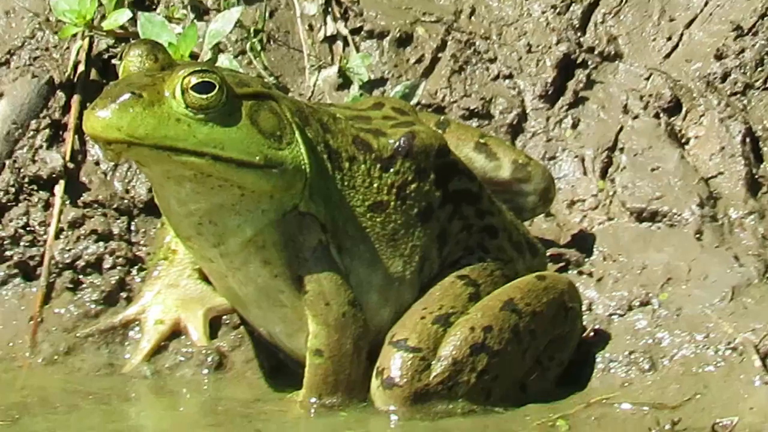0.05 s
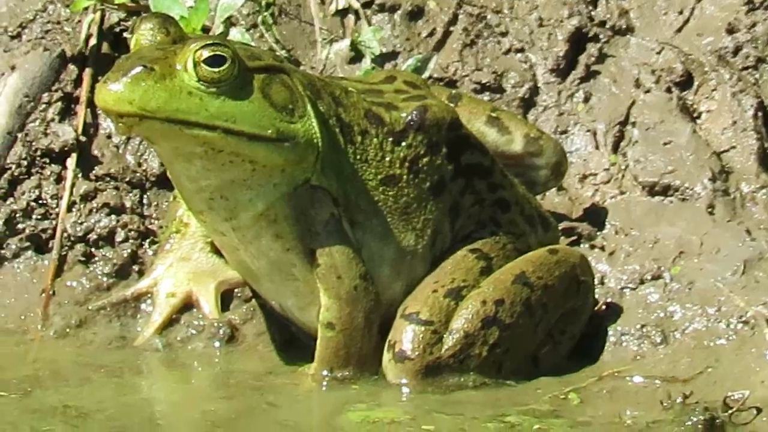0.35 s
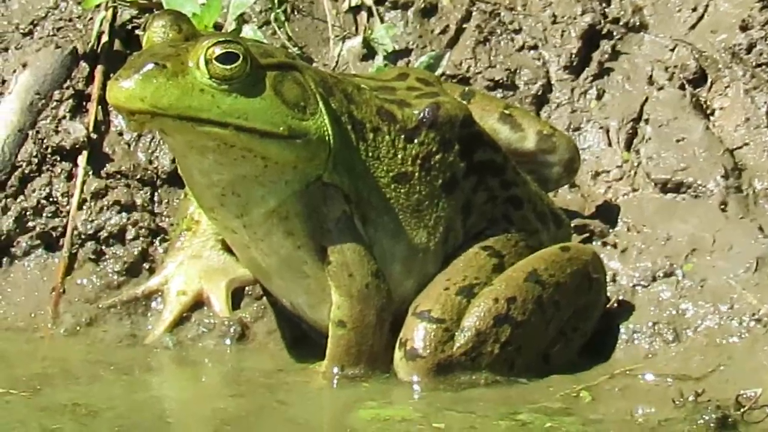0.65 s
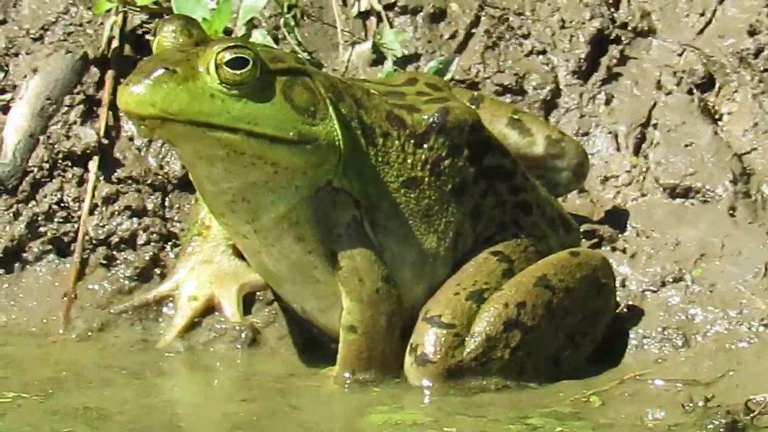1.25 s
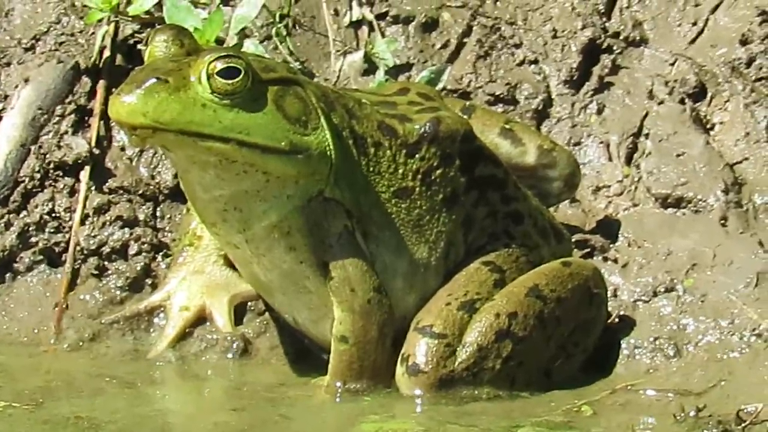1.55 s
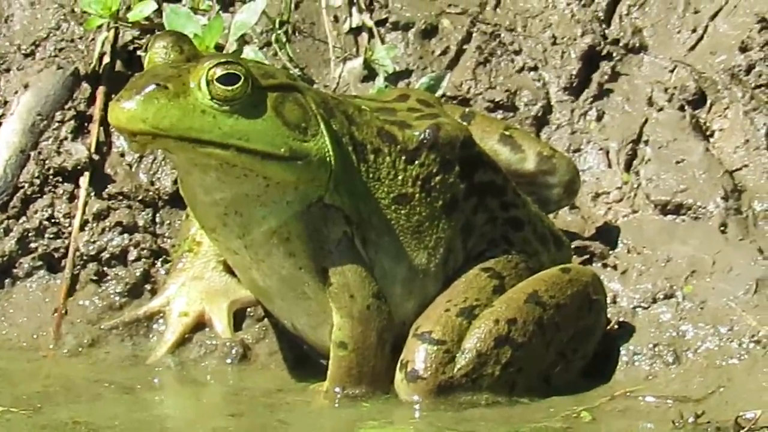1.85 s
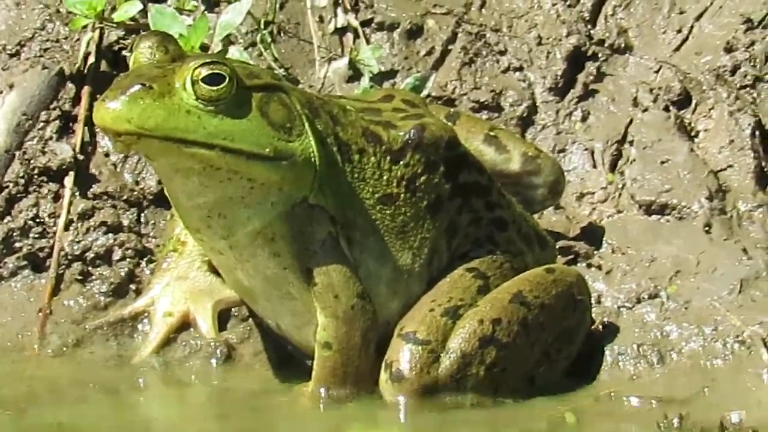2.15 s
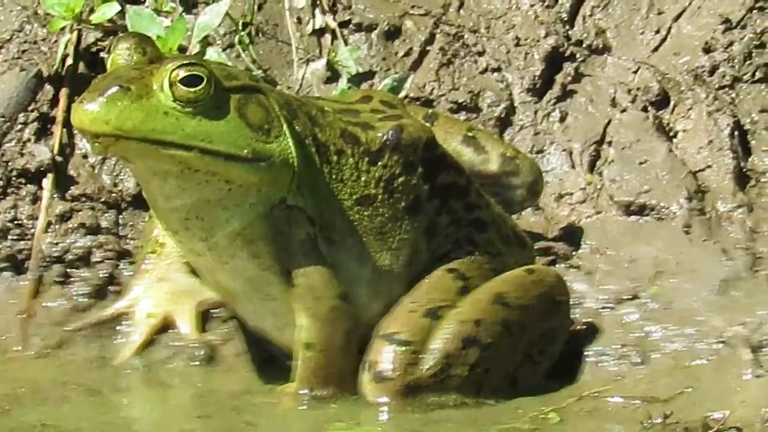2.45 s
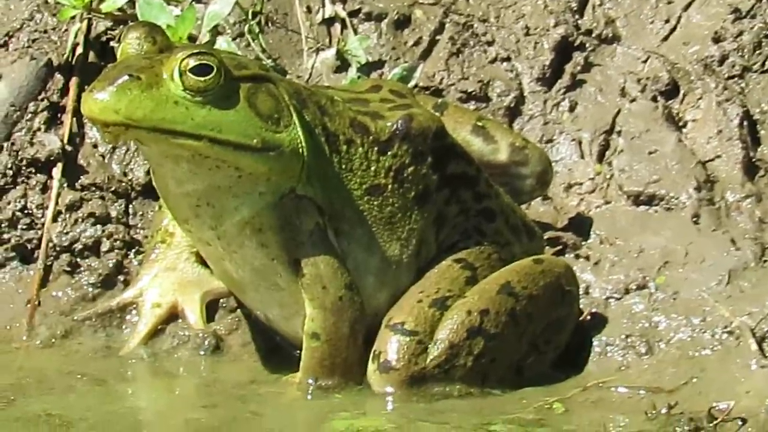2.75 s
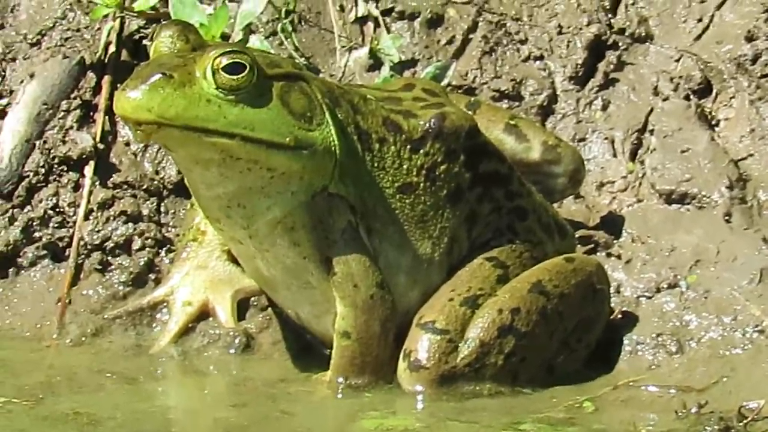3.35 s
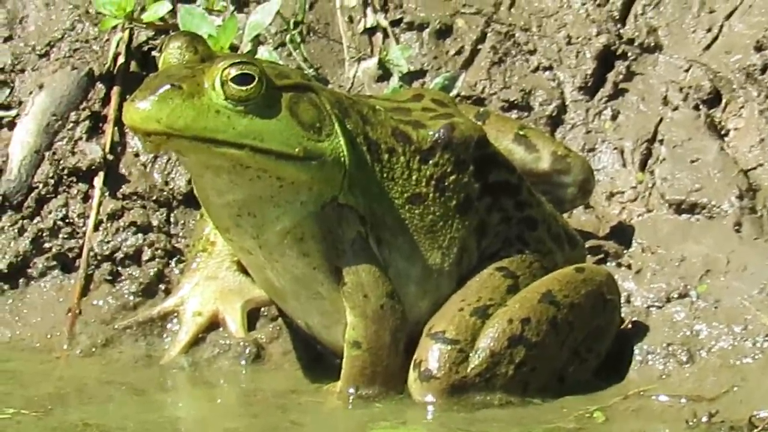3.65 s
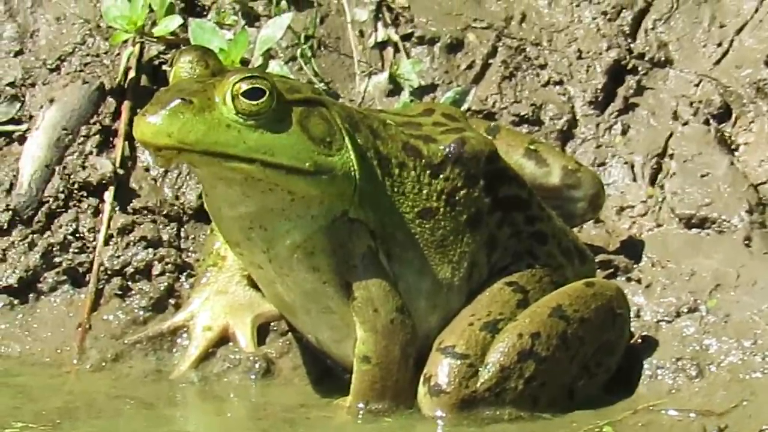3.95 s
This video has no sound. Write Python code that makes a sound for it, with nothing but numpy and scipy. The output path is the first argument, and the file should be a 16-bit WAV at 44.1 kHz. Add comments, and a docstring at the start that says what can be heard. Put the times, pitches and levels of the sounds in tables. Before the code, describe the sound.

Low throb and hum of a distant idling engine, with brief bird chirps and faraway traffic.

```python
"""A heavy engine idles some way off, heard in stereo from a pond bank in the open air.
Its unequal cylinders give a low thud, its body throbs in every cycle, and it hums steadily.
Behind it lies the wash of distant traffic; a light breeze lifts the hiss of the leaves towards the end.
A small bird whistles a run of falling chirps, doubled by the near bank; fainter chirps come later."""
import sys
import numpy as np
from scipy import signal
from scipy.fft import rfft, irfft
from scipy.io import wavfile
from scipy.ndimage import uniform_filter1d

SR = 44100
rng = np.random.default_rng(int(sys.argv[2]) if len(sys.argv) > 2 else 0)


def inscribe(sig):
    """Save sig as 16-bit PCM at rate SR to the path in sys.argv[1].

    A 1-D sig is mono; a 2-D sig holds one channel per row.
    Samples are clipped to [-1, 1] before scaling.
    """
    pcm = np.round(np.clip(np.atleast_2d(sig).T, -1, 1) * 32767)
    wavfile.write(sys.argv[1], SR, pcm.astype(np.int16))


N = 176400

# How alike the air sounds at the left and right microphones: frequency_hz, correlation
LIKENESS = [(40, 0.98), (125, 0.99), (250, 0.8), (500, 0.33), (1000, 0.45), (3000, 0.2), (8000, 0.24),
            (15000, .05)]
# Spectrum of the distant traffic: frequency_hz, relative_db
TRAFFIC_SPECTRUM = [(9, -19), (19, -9), (50, -12.5), (95, -10.5), (140, -0.5), (175, 0), (210, -4.5),
                    (280, -3), (340, -6.5), (420, -11.5), (500, -14), (570, -16.5), (655, -19.5),
                    (705, -13), (830, -18), (1120, -21.5), (1350, -26.5), (2200, -30), (3500, -36.5),
                    (6000, -43.5), (15000, -52)]
# Spectrum of the leaves' hiss: frequency_hz, relative_db
LEAF_SPECTRUM = [(800, -9), (2500, 5.5), (4500, 6), (6500, -1), (10000, -1), (13000, -3), (14300, -14),
                 (15200, -28)]
# The leaves' hiss as the breeze rises: time_s, level_db
BREEZE = [(0, -71.5), (1.5, -72), (2.3, -69), (3.2, -67), (3.6, -64), (4, -64.5)]
# The bird's chirps: start_s, length_s, top_pitch_hz, share_before_top, fall_octaves, level_db, rasp_share
CHIRPS = [(.125, 0.062, 3770, 0.038, .85, -62.5, 0.6), (.116, 0.025, 1590, 0.18, .15, -57, .7),
          (.122, 0.037, 2250, .2, 0.36, -60.5, 0.95), (.146, .036, 1927, .1, .3, -61, 0.6),
          (.138, .044, 6600, 0.029, 0.74, -66, 0), (.145, 0.025, 5700, 0.034, .45, -69, .2),
          (.207, .08, 5230, .21, .85, -51.5, .3), (.21, 0.055, 5970, 0.42, 0.037, -67, 0.3),
          (.252, 0.039, 6150, .15, .55, -71.5, .6), (.347, 0.084, 5360, .23, 1.13, -51, 0.26),
          (.372, .058, 6000, 0.14, .7, -72.5, .6), (.493, .07, 4620, .12, 1.8, -61, 0.65),
          (1.672, 0.025, 4840, 0.39, .08, -62, .7), (3.15, .04, 3050, 0.22, 0.13, -64, 0.6),
          (3.298, .034, 4080, 0.32, 0.15, -62, 0.5), (3.438, 0.068, 4140, .38, .16, -64, .4),
          (3.58, 0.058, 4180, .38, 0.23, -60.5, 0.2), (3.634, .03, 5650, 0.045, .25, -66.5, 0.5),
          (3.955, .04, 2400, .4, 0.11, -62, 0.5)]
# Tones of the engine's hum: pitch_hz, level_db
HUM_TONES = [(82.9, -60.5), (186.1, -48), (251.5, -54.5), (322, -59.5), (337.3, -62.5), (464, -64.5),
             (990, -74.5)]
# Strength of the engine's throb: time_s, relative_db
THROB = [(0, -7), (.4, 1.5), (.58, 1), (.94, -2.5), (1.12, 2), (1.35, -0.5), (2.03, 0.5), (2.21, -7.5),
         (2.57, 1), (2.75, 1.5), (2.93, 0), (3.3, 2), (3.66, -2), (4, -5)]
# Surges of the engine's body in each cycle: centre_s, width_s, pitch_hz, width_hz, level_db, throb_share
SURGES = [(.039, 0.008, 251, 21, -49, 1), (.076, .011, 256.6, 64, -53.5, .3),
          (.085, 0.01, 160, 51, -54.5, 0), (.069, 0.0039, 460, 25, -62, 0),
          (.131, 0.0063, 477, 28, -65.5, 0), (.075, 0.034, 375, 26, -60, 0)]
# The six cylinders in firing order: relative_db
CYLINDER_DB = [-5.5, 0, -3.5, -4.5, -5, 0]

CYCLE_HZ, FIRST_FIRING_S = 5.525, 0.0252  # one engine cycle = six firings
SIDE_SIGN = np.array([[1], [-1]])  # left, right


def undb(db):
    """Decibels to gain."""
    return 10 ** (np.asarray(db) / 20)


def level(x, db):
    """Set the rms level."""
    return x * undb(db) / np.sqrt(np.mean(x ** 2))


def pan(db):
    """Left and right gains for a level difference."""
    return undb(SIDE_SIGN * db / 2)


def walk(rate_hz):
    """Smooth random wander, rate_hz new values a second, with a spread near 1."""
    hold = max(int(SR / rate_hz), 1)
    steps = np.repeat(rng.standard_normal(N // hold + 1), hold)
    return 1.3 * uniform_filter1d(uniform_filter1d(steps, hold), hold)[:N]


def bin_hz():
    """Frequency axis of the whole sound."""
    return np.maximum(np.arange(N // 2 + 1) * SR / N, 1)


def curve(points):
    """Join (frequency_hz, value) points on a log-frequency axis."""
    hz, value = np.array(points).T
    return np.interp(np.log(bin_hz()), np.log(hz), value)


def air(colour):
    """Spectrum of open-air noise: alike at both microphones in the bass, diffuse in the treble."""
    mid, side = rfft(rng.standard_normal((2, N)))
    alike = curve(LIKENESS)
    return undb(curve(colour)) * (mid * np.sqrt(1 + alike) + side * np.sqrt(1 - alike) * SIDE_SIGN)


def traffic(level_db=-42, swell_db=0.43, flicker_db=0.65, band_count=10):
    """Far road noise in octave bands that swell together and flicker alone."""
    spectrum, swell = air(TRAFFIC_SPECTRUM), swell_db * walk(1.5)
    octave = np.clip(np.log2(bin_hz() / 25), 0, band_count - 1)
    wash = 0
    for k in range(band_count):
        band = irfft(spectrum * np.maximum(1 - abs(octave - k), 0), N)
        wash += band * undb(swell + flicker_db * walk(9))
    return level(wash, level_db)


def leaves(t, flicker_db=0.76):
    """Far leaves: a smooth hiss that follows the breeze."""
    hiss = level(irfft(air(LEAF_SPECTRUM), N), 0)
    return hiss * undb(np.interp(t, *np.array(BREEZE).T) + flicker_db * walk(24.97))


def bird(t, flutter_db=2, rasp_hz=700, lean=0.28):
    """A small bird: each chirp is a more or less raspy whistle that arches up and slides down."""
    song = np.zeros(N)
    flutter, jitter = undb(flutter_db * walk(220)), 1 + 0.0023 * walk(600)
    scratch = (walk(rasp_hz) + 1j * walk(rasp_hz)) / np.sqrt(2)
    for start, length, hz, top, fall, db, rasp in CHIRPS:
        on = (t >= start) & (t < start + length)
        progress = (t[on] - start) / length
        top = np.clip(top, .03, .8)
        bend = 2 * top  # rounds the top of the arch
        arch = (np.hypot((progress - top) / (1 - top), bend) - bend) / (np.hypot(1, bend) - bend)
        drop_octaves = fall * arch * np.where(progress < top, 1 + lean, 1)
        attack = np.minimum(progress / (1.4 * top), 1)
        release = np.clip((1 - progress) / 0.6, 0, 1) ** 1.57
        whistle = np.exp(2j * np.pi * np.cumsum(hz * 2 ** -drop_octaves * jitter[on]) / SR)
        voice = np.imag(whistle * (np.sqrt(1 - rasp ** 2) + rasp * scratch[on]))
        song[on] += np.sqrt(2) * undb(db) * attack * release * flutter[on] * voice
    return song


def pond_bank(t, song, delay_s=.0072, bank_db=-8.5, echo_db=-13, echo_t60_s=.35):
    """The song arrives from slightly right; the near bank reflects it and a faint echo follows."""
    tail = rng.standard_normal((2, N)) * np.exp(-np.log(1000) * t / echo_t60_s)
    tail /= np.sqrt(np.sum(tail[0] ** 2))
    echo = signal.fftconvolve(song[None], tail, axes=1)[:, :N]
    reflection = undb(bank_db) * np.interp(t - delay_s, t, song)
    return (song + reflection) * pan(db=-1) + undb(echo_db) * echo


def engine_hum(waver_db=3.5, drift_share=.0012):
    """The engine's steady tones, each wavering a little in pitch and level."""
    hum = 0
    for hz, db in HUM_TONES:
        pitch_hz = hz * (1 + drift_share * walk(3.1))
        tone = np.sin(2 * np.pi * np.cumsum(pitch_hz) / SR)
        hum += level(tone * undb(waver_db * walk(3.93)), db)
    return hum


def engine_body(t, ring_share=.85, slip_s=0.00041, scatter_db=0.4, side_gain=0.21):
    """Resonances shaken at the same points of every engine cycle: part repeating ring, part rumble."""
    body = 0
    throb_db = np.interp(t, *np.array(THROB).T)
    for centre_s, width_s, hz, width_hz, db, throb_share in SURGES:
        resonance = 1 / (1 + (2 * (bin_hz() - hz) / width_hz) ** 2)
        rumble, side = irfft(rfft(rng.standard_normal((2, N))) * resonance, N)
        cycle = np.round((t - centre_s) * CYCLE_HZ).astype(int)
        offset_s = t - centre_s - cycle / CYCLE_HZ
        slip, strength = rng.standard_normal((64, 2))[cycle].T  # no two cycles ring quite alike
        ring = undb(scatter_db * strength) * np.sin(2 * np.pi * hz * (offset_s + slip_s * slip))
        mid = np.sqrt(ring_share) * level(ring, 0) + np.sqrt(1 - ring_share) * level(rumble, 0)
        shake = mid + side_gain * level(side, 0) * SIDE_SIGN
        surge = undb(throb_share * throb_db) * np.exp(-.5 * (offset_s / width_s) ** 2)
        body += level(shake * surge, db)
    return body * pan(db=0.2)


def engine_exhaust(t, level_db=-45, width_s=0.0042, scatter_db=0.55, low_cut_hz=30.5):
    """The low thud some way off: one soft pressure pulse per firing, from unequal cylinders."""
    cylinders = len(CYLINDER_DB)
    firing_hz = CYCLE_HZ * cylinders
    firings = (t - FIRST_FIRING_S) * firing_hz + cylinders
    nearest = np.round(firings).astype(int)
    pulse_db = np.array(CYLINDER_DB)[nearest % cylinders] + scatter_db * rng.standard_normal(256)[nearest]
    pulses = undb(pulse_db) * np.exp(-.5 * ((firings - nearest) / (firing_hz * width_s)) ** 2)
    thud = irfft(rfft(pulses) / (1 + (low_cut_hz / bin_hz()) ** 4), N)
    return level(thud, level_db)


def scene():
    """The idling engine, far leaves and traffic, and the bird, as they reach the bank."""
    t = np.arange(N) / SR
    thud_and_throb = engine_exhaust(t) + engine_body(t)
    return thud_and_throb + leaves(t) + traffic() + engine_hum() + pond_bank(t, bird(t))


def record(dry, top_hz=14600, settle_samples=512):
    """The camera at the bank cuts the top treble; a short lead-in lets its filter settle."""
    padded = np.pad(dry, ((0, 0), (settle_samples, 0)), mode="reflect", reflect_type="odd")
    low_pass = signal.ellip(8, .2, 70, top_hz, fs=SR, output="sos")
    return signal.sosfilt(low_pass, padded)[:, settle_samples:]


dry = scene()
out = record(dry)
inscribe(out)
```